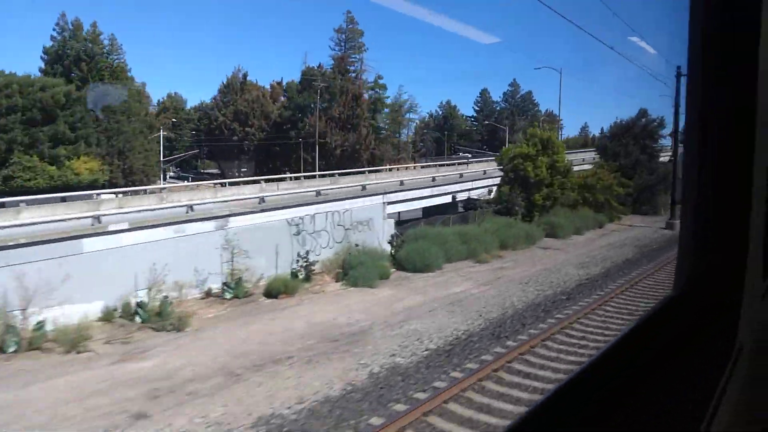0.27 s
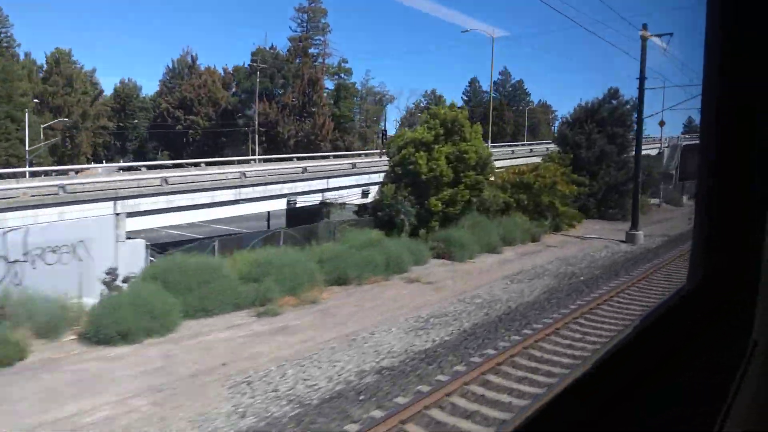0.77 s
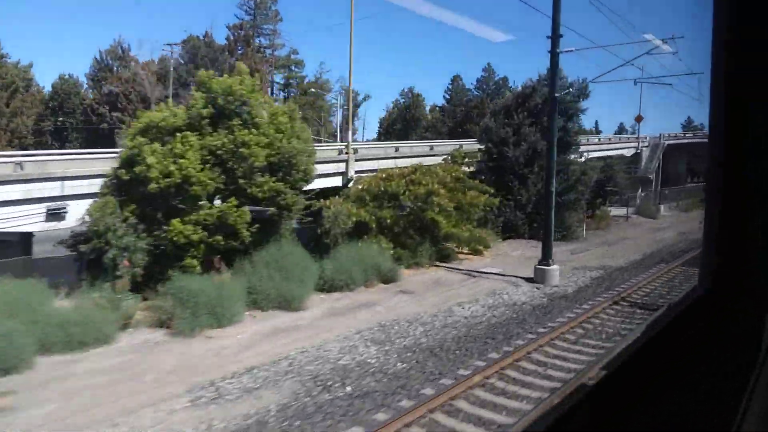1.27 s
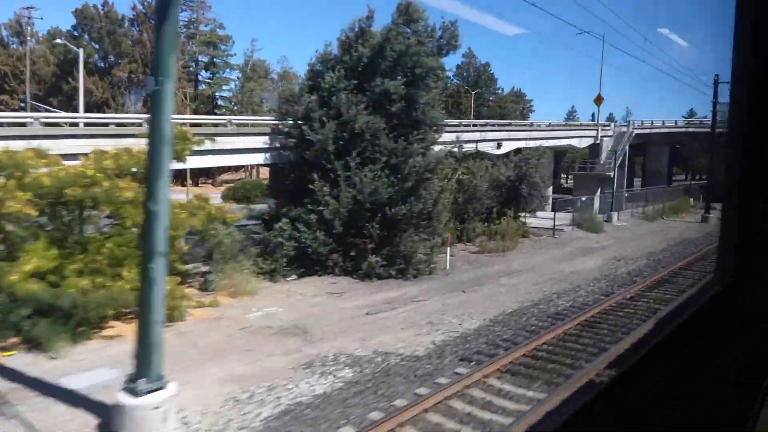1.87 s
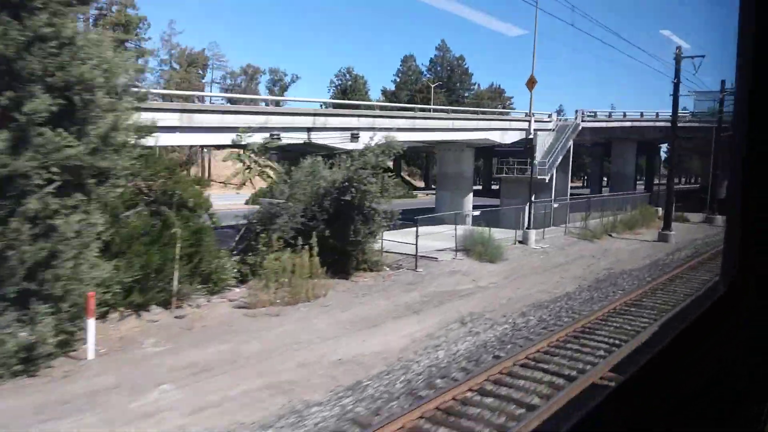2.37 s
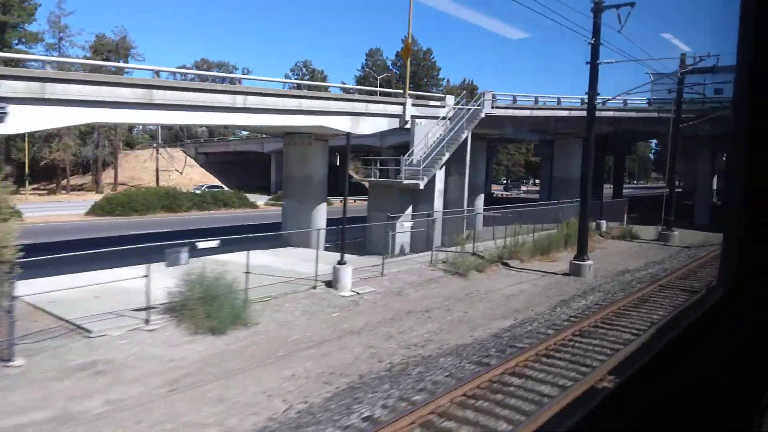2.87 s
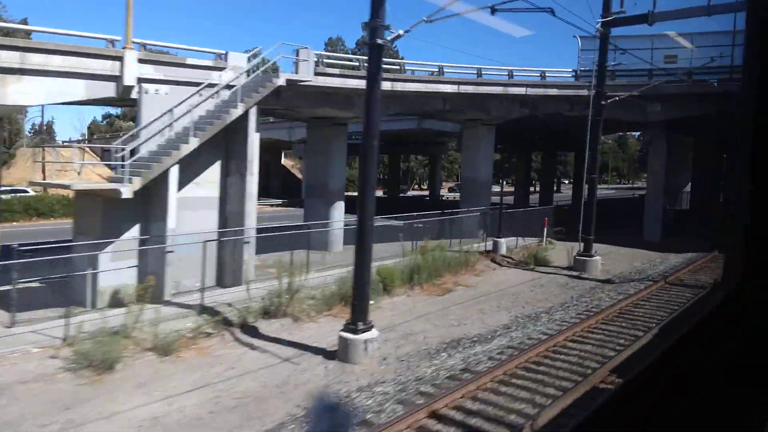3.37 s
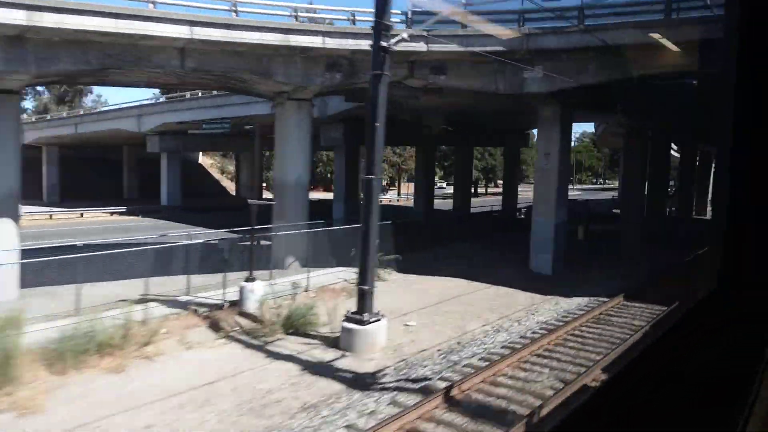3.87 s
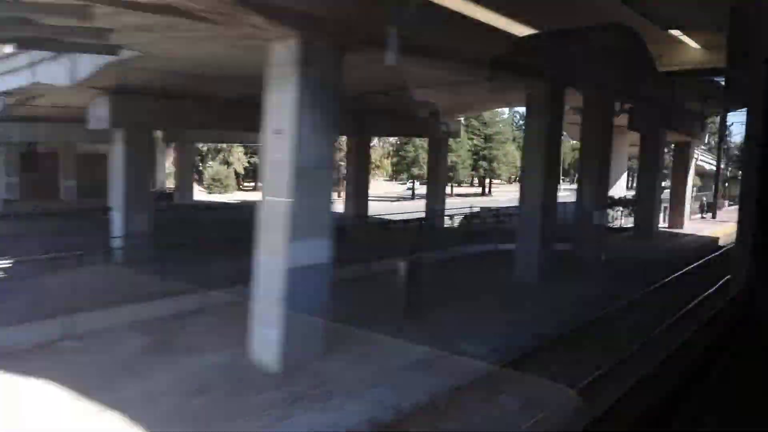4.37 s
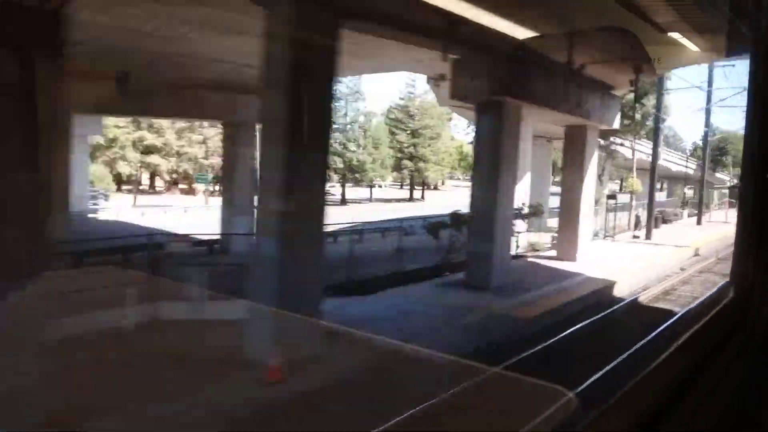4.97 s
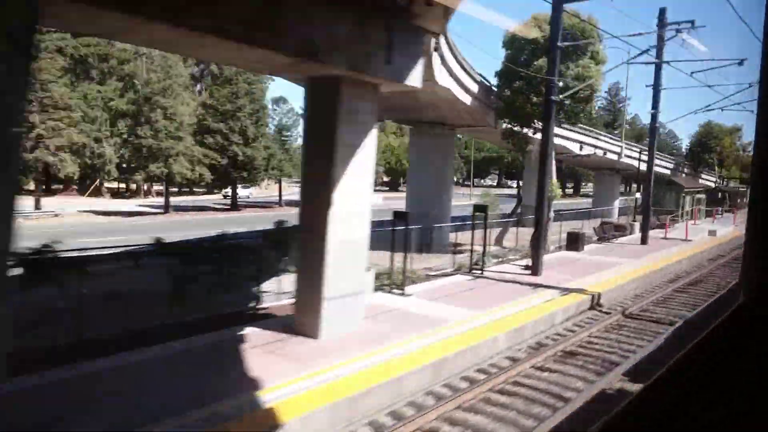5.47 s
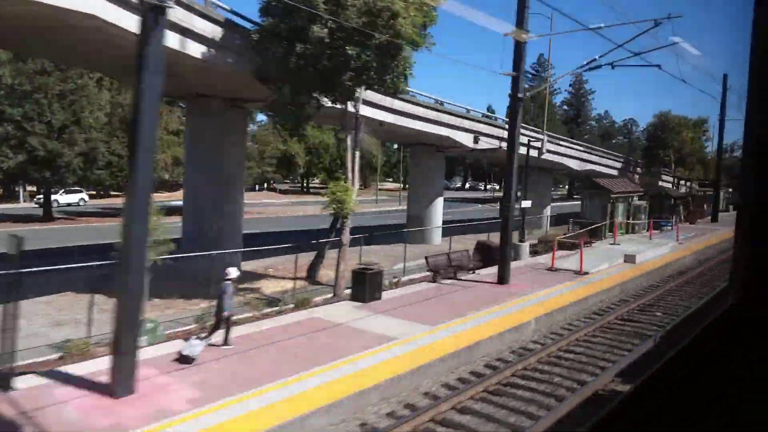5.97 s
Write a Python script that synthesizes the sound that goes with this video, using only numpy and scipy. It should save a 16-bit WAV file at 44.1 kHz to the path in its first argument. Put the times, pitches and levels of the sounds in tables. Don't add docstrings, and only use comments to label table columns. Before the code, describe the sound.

Steady low carriage rumble with soft irregular thuds, humming fans, a thin drifting high tone and quiet duct hiss as a train rolls along.

```python
import sys
import numpy as np
from scipy import signal
from scipy.fft import rfft, irfft, next_fast_len
from scipy.io import wavfile
from scipy.ndimage import uniform_filter1d, map_coordinates

SR = 44100
rng = np.random.default_rng(int(sys.argv[2]) if len(sys.argv) > 2 else 0)


def attenuation_scalar(level_db):
    decades = np.asarray(level_db, float) / 20
    return 10 ** decades


def generate_wav(signal):
    frames = np.transpose(np.atleast_2d(signal))
    scaled = np.clip(frames, -1, 1) * 32767
    pcm = np.round(scaled).astype(np.int16)
    wavfile.write(sys.argv[1], SR, pcm)


N = 274743
TIME_S = np.arange(N) / SR


def unit(x):
    return x / np.sqrt(np.mean(x.mean(0) ** 2) + 1e-20)


def curves(rows):
    s, *columns = np.transpose(rows)
    return [np.interp(TIME_S, s, column) for column in columns]


def wobble(rate_hz):
    knots = rng.standard_normal(int(N * rate_hz / SR) + 4)
    return map_coordinates(knots, [np.arange(N) * rate_hz / SR])


def swells(rows, rest_db):
    t = np.arange(0, N + 64, 64) / SR
    power = attenuation_scalar(2 * rest_db)
    for s, length_s, db in rows:
        power = power + attenuation_scalar(2 * db) * np.exp(-(2 * (t - s) / length_s) ** 2)
    return np.interp(TIME_S, t, 10 * np.log10(power))


def jolts(rows, length_s, rest_db):
    return attenuation_scalar(swells([(s, length_s, db) for s, db in rows], rest_db))


# (frequency [Hz], likeness [-1..1], left port's phase lead [rad])
COHERENCE = [(25, 1, -0.042), (80, 1, -0.13), (203, 1, 0), (284, 0.9, 0.53), (350, 0.99, 0.092),
             (381, 0.66, -1.3), (470, 0.8, 1), (610, 0.16, -0.05), (705, 0.72, 0.42), (820, 0.054, 0),
             (1150, 0.46, 0.2), (1320, -0.19, 0), (2000, -0.016, -0.077), (2280, 0.47, 0.055),
             (3000, 0.046, 0.036), (3700, -0.028, 0.11)]


def cabin_noise(spectrum, lo_hz, hi_hz):
    m = next_fast_len(N)
    hz = np.fft.rfftfreq(m, 1 / SR)

    def on_log(rows):
        return [np.interp(np.log(hz + 1), np.log(rows[:, 0] + 1), column) for column in rows[:, 1:].T]

    likeness, lead = on_log(np.array(COHERENCE))
    turn = np.arccos(np.clip(likeness, -1, 1)) / 2
    a, b = rfft(rng.standard_normal((2, m)))
    shared = np.cos(turn) * a * np.exp([.5j * lead, -.5j * lead])
    opposed = np.sin(turn) * b * [[1], [-1]]
    in_band = (hz >= lo_hz) & (hz < hi_hz)
    gain = attenuation_scalar(on_log(np.array(spectrum))) * np.sqrt(SR / 2) * in_band
    return irfft((shared + opposed) * gain, m)[:, :N]


def steadied(x, seconds, share):
    size = int(seconds * SR)
    power = uniform_filter1d(x.mean(0) ** 2, size)
    power = np.abs(uniform_filter1d(power, size))
    return unit(x / (power + .02 * power.mean()) ** (share / 2))


# (frequency [Hz], left level [dB], right level [dB])
SUSPENSION = [(3, -22, -17), (8, -5.5, -6.5), (13, 1, 1), (22.4, -2.5, -3.5), (29.5, -3.5, -2),
              (40.6, -5.5, -8), (50.3, -14, -13.5), (58, -11, -10.5)]
# (frequency [Hz], left level [dB], right level [dB])
BENDING_MODES = [(58, -12, -12), (63, -4, -4), (67.5, 0, 0), (72, -5, -5), (78, -11, -11)]
# (frequency [Hz], left density [dB per Hz], right density [dB per Hz])
DRONE_SPECTRUM = [(97, -49.5, -48.5), (102.4, -55, -54), (118, -52, -51.5), (130, -58, -59.5),
                  (166, -57, -56), (188, -52.5, -53), (214, -56, -57), (250, -58.5, -56.5), (263, -58, -56),
                  (326, -65, -59.5), (330, -54, -60)]
# (time [s], peak level [dB])
TRACK_DIPS = [(.4, -30), (.68, -22.5), (.9, -26), (1.51, -28), (2.08, -32), (2.39, -15), (2.6, -24),
              (2.9, -30.5), (3.14, -19), (3.4, -20.5), (3.64, -26), (3.85, -27.5), (4.2, -26), (4.58, -19),
              (4.85, -23.5), (5.15, -27), (5.45, -23), (5.78, -23), (6.07, -20.5)]
# (time [s], peak level [dB])
RAIL_JOINTS = [(.08, -27), (.5, -21.5), (.63, -20), (.83, -25), (.98, -30), (1.3, -24.5), (1.54, -20.5),
               (1.71, -17.5), (2.27, -18), (2.42, -20), (2.53, -21), (2.64, -18.5), (2.86, -24),
               (3.07, -24.5), (3.26, -22.5), (3.46, -29.5), (3.61, -20), (3.78, -27), (4.04, -22.5),
               (4.15, -17.5), (4.25, -21.5), (4.34, -17.5), (4.42, -22.5), (4.7, -29), (4.87, -25),
               (5.08, -22.5), (5.2, -24.5), (5.32, -23.5), (5.6, -18.5), (6.06, -24.5), (6.2, -24.5)]
# (time [s], peak level [dB])
FLOOR_KNOCKS = [(.58, -28), (.76, -30), (.92, -29), (1.14, -26.5), (1.55, -27), (1.71, -21), (2.1, -27.5),
                (2.28, -23), (2.88, -31.5), (3.0, -29), (3.21, -36), (3.52, -25.5), (3.87, -30.5),
                (4.2, -42), (4.4, -34), (4.56, -29.5), (4.73, -29.5), (5.08, -46), (5.25, -27),
                (5.47, -27.5), (5.88, -32), (6.2, -31)]
# (time [s], peak level [dB])
AIR_THUMPS = [(0, -25.5), (.22, -31), (.43, -34.5), (.69, -28.5), (.9, -28.5), (1.22, -29), (1.49, -26.5),
              (1.7, -30), (1.88, -32.5), (2.26, -30.5), (2.45, -29.5), (2.72, -33.5), (2.87, -33.5),
              (3.19, -31), (3.42, -33), (4.23, -33), (4.5, -31.5), (4.7, -32), (5.0, -37), (5.15, -32),
              (5.5, -39), (5.75, -32), (5.85, -35), (6.13, -32.5)]


def car_body():
    heave = jolts(TRACK_DIPS, length_s=.14, rest_db=-31)
    heave = heave * steadied(cabin_noise(SUSPENSION, 2, 25), seconds=0.077, share=0.57)
    sway = jolts(RAIL_JOINTS, length_s=.07, rest_db=-30.5)
    sway = sway * steadied(cabin_noise(SUSPENSION, 24, 58), seconds=0.051, share=0.33)

    floor_rest_db, worn_end_s, worn_fade_s = -39.5, 1.96, 0.07
    worn = attenuation_scalar(floor_rest_db + 10.5) * (1 - np.tanh((TIME_S - worn_end_s) / worn_fade_s)) / 2
    bounce = np.hypot(worn, jolts(FLOOR_KNOCKS, length_s=0.088, rest_db=floor_rest_db))
    bounce = bounce * steadied(cabin_noise(BENDING_MODES, 58, 78), seconds=0.072, share=0.72)

    boom = jolts(AIR_THUMPS, length_s=0.097, rest_db=-37)
    boom = boom * steadied(cabin_noise(DRONE_SPECTRUM, 78, 165), seconds=0.07, share=0.85)
    return heave + sway + bounce + boom


# (frequency [Hz], left density [dB per Hz], right density [dB per Hz])
ROAR_SPECTRUM = [(330, -64.9, -61.6), (390, -73.0, -68.7), (460, -72.2, -70.8), (550, -69.1, -69.6),
                 (680, -75.0, -71.1), (820, -76.7, -74.2), (950, -74.7, -75.6), (1150, -78.9, -81.0),
                 (1350, -81.8, -82.0), (1700, -82.3, -84.7), (2000, -82.0, -84.6), (2300, -81.6, -84.8),
                 (2700, -84.4, -88.8), (3100, -86.3, -90.1)]
# (time [s], level [dB])
REFLECTIONS = [
    (0, -0.5),
    (1.3, -.5),
    (1.6, 0),
    (2.7, -0.5),
    (3.9, 0),
    (4.6, 0.5),
    (5.25, 2),
    (5.9, 1.5),
    (6.23, 0),
]
# (time [s], level over rolling [dB])
ROUGH_PATCHES = [(0, 0.5), (1.49, 1.5), (3.21, 1), (4.01, 2), (4.34, -5), (4.72, -11), (5.07, -4),
                 (5.27, -4), (5.42, -5), (5.6, -0.5), (5.78, -1)]


def wheels():
    rolling_db, = curves(REFLECTIONS)
    drone = attenuation_scalar(-37 + 1.3 * rolling_db) * jolts(ROUGH_PATCHES, length_s=0.087, rest_db=0.5)
    drone = drone * steadied(cabin_noise(DRONE_SPECTRUM, 165, 330), seconds=0.097, share=0.62)
    roar = attenuation_scalar(-44.5 + 0.84 * rolling_db)
    roar = roar * steadied(cabin_noise(ROAR_SPECTRUM, 330, 1250), seconds=0.088, share=0.22)
    return drone + roar


# (frequency [Hz], left density [dB per Hz], right density [dB per Hz])
DUCT_SPECTRUM = [(3100, -86, -91.5), (3950, -86.5, -88.5), (4400, -83, -92), (4980, -88.5, -95),
                 (5750, -94.0, -100.1), (7300, -93.5, -105.7), (7550, -94.5, -107.5),
                 (8900, -106.1, -108.2), (9040, -110.7, -107.8), (10400, -120.2, -105.0),
                 (11500, -124.6, -108.6), (12600, -127.8, -116.1), (14000, -127.4, -123.1),
                 (15500, -127.1, -126.6)]


def ducts():
    breathing = attenuation_scalar(0.42 * wobble(4.0))
    hiss = cabin_noise(ROAR_SPECTRUM, 1250, 3100) + cabin_noise(DUCT_SPECTRUM, 3100, 15750)
    return breathing * hiss


NEAR_LAG_S, FAR_LAG_S = .00006, .00011


def tone(hz, ports_db, fade_db, drift_db, blur, lag_s=NEAR_LAG_S):
    wander = np.array([wobble(1.86), wobble(2.17)])
    cycles = hz * (TIME_S - np.c_[[0, lag_s]]) + rng.random()
    phase = 2 * np.pi * cycles + blur * wobble(3.08) + drift_db / 4 * wander[::-1]
    level_db = np.array(ports_db)[:, None] + fade_db + drift_db * wander
    return np.sqrt(2) * attenuation_scalar(level_db) * np.sin(phase)


RIPPLE_HZ, LAMP_HZ, FAN_DRIVE_HZ = 119.953, 976.48, 10060.2
RIPPLE_MULTIPLES = np.r_[29:39, 63:72]
# (left level [dB], right level [dB])
RIPPLE_LEVELS = [(-77, -80), (-70, -81), (-64, -65), (-59, -70), (-64, -68), (-60, -65), (-63, -74),
                 (-80, -75), (-71, -81), (-71, -85), (-74, -93), (-72, -85), (-79, -90), (-85, -97),
                 (-83, -102), (-77, -86), (-80, -85), (-89, -92), (-89, -94)]
STANDING_WAVE = {31: 0, 32: 1, 34: 2, 35: 3, 64: 4, 30: 5, 33: 6, 69: 7, 65: 8}
LAMP_MULTIPLES = np.array([3, 6, 7, 8, 9, 11, 12, 13, 14, 16])
# (left level [dB], right level [dB])
LAMP_LEVELS = [(-77, -120), (-84, -96), (-82, -92), (-79, -90), (-91, -86), (-110, -87), (-112, -99),
               (-118, -97), (-111, -103), (-110, -110)]
SIDEBANDS = np.array([-3, -2, -1, 0, 2])
# (left level [dB], right level [dB])
SIDEBAND_LEVELS = [(-106, -91), (-101, -81), (-101, -83), (-102, -74), (-107, -95)]
HUM_LINES_HZ = [117.8, 120, 273.5, 279.9, 1094.8, 3778.4]
# (left level [dB], right level [dB])
HUM_LEVELS = [(-43, -42), (-44, -43), (-48, -46), (-48, -45), (-70, -68), (-73, -79)]
# (time [s], level [dB])
FAN_SWELL = [
    (0, -1),
    (1.4, 0),
    (1.8, -7),
    (3.2, -6),
    (3.8, 1),
    (4.6, 5),
    (5.3, 3),
    (6.2, -6),
]
# (time [s], length [s], level [dB])
ANTINODES = [
    [(.6, .6, 1), (3.3, 0.36, 3.5), (4.8, 0.97, 2)],
    [(.15, 0.65, 7.5), (.6, 0.59, -3), (1.08, 0.35, 8.5), (1.9, 0.78, -0.5), (3.0, .5, -10),
     (3.85, 0.73, 2), (5.25, 0.4, -3), (6.0, 0.33, -3)],
    [(.8, 1, -1), (2.3, 0.68, -3), (3.7, .4, 6), (4.65, 0.97, 1.5)],
    [(.1, .4, 4), (1.2, 0.45, 3), (1.55, 0.43, 0), (2.0, .45, 6.5), (3.0, .25, 2), (3.8, 0.55, -1),
     (4.5, 0.48, -5), (6.1, .3, 1)],
    [(1.2, 0.51, -4), (2.9, 1, 6), (4.6, 0.99, 4), (5.7, 0.98, 5)],
]
NODE_DB = [-12, -16.5, -8, -6, -4]
# (time [s], length [s], level [dB])
MORE_ANTINODES = [
    [(1.4, .4, 1), (3.0, 1.6, 5), (4.3, .6, 7), (5.7, 1.4, 4)],
    [(.5, 2, 7.5), (2.6, .9, 6), (3.8, .5, 1)],
    [(0, .6, 10), (.9, 1.2, 5), (3.35, .4, 4), (4.3, .4, 0), (5.4, 1.1, -2)],
    [(.4, 1.4, 0), (2.6, 1.8, 4), (4.6, .9, 2)],
]
MORE_NODE_DB = [-5, -7.5, -7, -3]
# (time [s], length [s], level [dB])
FAN_ANTINODES = [(.75, .3, -3), (1.5, 0.33, -1), (2.1, .5, -2), (3.0, 0.93, 0.5), (4.15, 1.7, 0.5),
                 (5.75, .3, -5)]
# (time [s], length [s], level [dB])
LAMP_ANTINODES = [(.2, .8, 6), (1.05, .4, 8), (2.8, 0.99, 6), (4.2, .5, -2), (5.0, .9, 3)]


def electrics():
    spots = zip(ANTINODES + MORE_ANTINODES, NODE_DB + MORE_NODE_DB)
    fades = [swells(rows, rest_db) for rows, rest_db in spots]
    fan_db = swells(FAN_ANTINODES, rest_db=-10.5)
    lamp_db = swells(LAMP_ANTINODES, rest_db=-6)
    out = np.zeros((2, N))
    for k, db in zip(RIPPLE_MULTIPLES, RIPPLE_LEVELS):
        fade_db, drift_db = 0, 2
        if k in STANDING_WAVE:
            fade_db = np.outer([1, .4], fades[STANDING_WAVE[k]])
            drift_db = .5
        first_list = STANDING_WAVE.get(k, 9) < 5
        lag_s = NEAR_LAG_S if first_list else FAR_LAG_S
        out += tone(k * RIPPLE_HZ, db, fade_db, drift_db, blur=.3, lag_s=lag_s)
    for k, db in zip(LAMP_MULTIPLES, LAMP_LEVELS):
        out += tone(k * LAMP_HZ, db, lamp_db if k == 11 else 0, drift_db=3.0, blur=.3)
    for k, db in zip(SIDEBANDS, SIDEBAND_LEVELS):
        out += tone(FAN_DRIVE_HZ + k * RIPPLE_HZ, db, fan_db, drift_db=.6, blur=.3)
    for hz, db in zip(HUM_LINES_HZ, HUM_LEVELS):
        swell_db = curves(FAN_SWELL)[0] if hz == HUM_LINES_HZ[2] else -1
        out += tone(hz, db, swell_db, drift_db=.15, blur=.25)
    return out


# (time [s], length [s], centre [Hz], width [Hz], level over the hiss [dB])
CLOTH_RUBS = [
    (2.455, .035, 9500, 5000, 6),
    (2.628, .06, 9500, 5000, 7),
    (4.14, 0.05, 7000, 2200, 4),
]


def sleeve():
    out = np.zeros((2, N))
    hz = np.fft.rfftfreq(N, 1 / SR)
    for s, length_s, centre_hz, width_hz, db in CLOTH_RUBS:
        band = np.exp(-((hz - centre_hz) / width_hz * 2) ** 4)
        cloth = irfft(rfft(cabin_noise(DUCT_SPECTRUM, 3100, 15750)) * band, N)
        u = np.clip((TIME_S - s) / length_s, 0, None)
        puff = 4 * u * np.exp(-3 * u ** 2)
        out += attenuation_scalar(db) * cloth * puff
    return out


def scene():
    return car_body() + wheels() + ducts() + electrics() + sleeve()


def band_limit(x):
    return signal.sosfilt(signal.butter(12, 15710, fs=SR, output="sos"), x)


# (frequency [Hz], left share of bands lost [0-1], right share of bands lost [0-1])
DROPOUTS = [(6000, 0, 0), (7500, 0, .08), (9000, .05, .09), (11500, .1, .08), (13000, .1, .2),
            (15500, .08, .12)]


def record(dry):
    dry = dry * np.clip(.15 + TIME_S / .006, 0, 1)
    hz, _, z = signal.stft(dry, SR, nperseg=2048)
    band = np.arange(len(hz)) // 7
    edge_hz, *shares = np.transpose(DROPOUTS)
    share = np.array([np.interp(hz, edge_hz, s) for s in shares])[..., None]
    dropped = rng.random((2, band[-1] + 1, z.shape[2]))[:, band] < share
    dropped = dropped | np.roll(dropped, 1, axis=2)
    steady = np.abs(z).mean(axis=2, keepdims=True)
    dropped &= steady < 1.15 * uniform_filter1d(steady, size=25, axis=1)
    lost = signal.istft(z * dropped, SR, nperseg=2048)[1][:, :N]
    return band_limit(dry - lost)


dry = scene()
out = record(dry)
generate_wav(out)
```